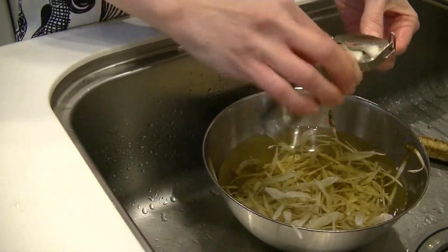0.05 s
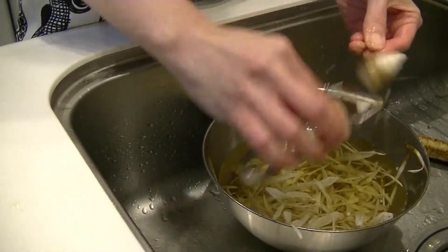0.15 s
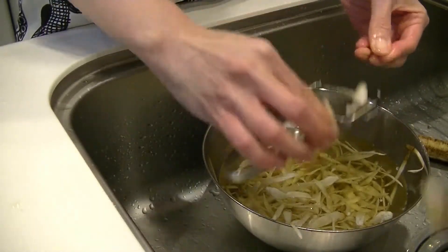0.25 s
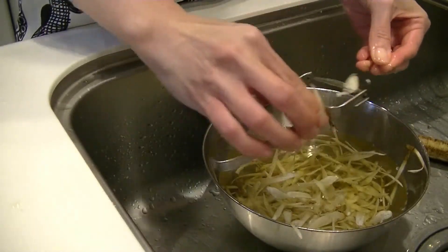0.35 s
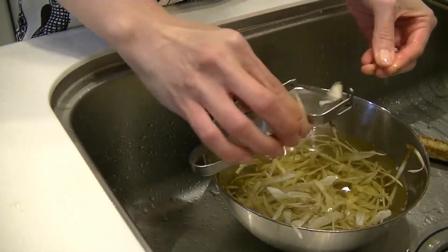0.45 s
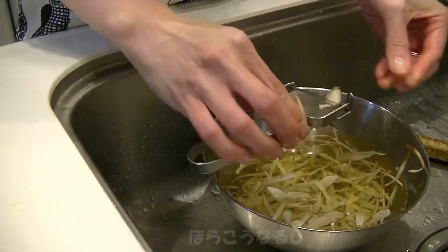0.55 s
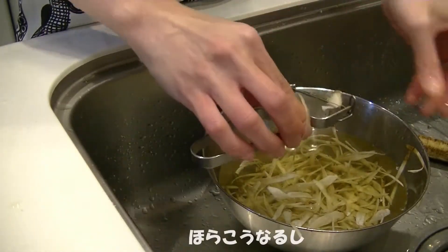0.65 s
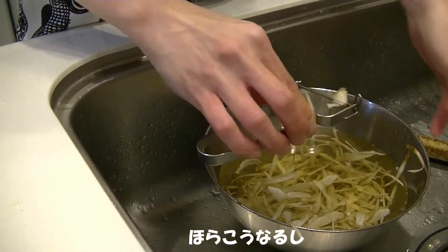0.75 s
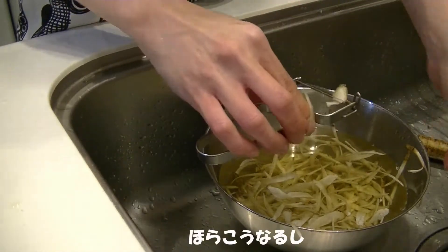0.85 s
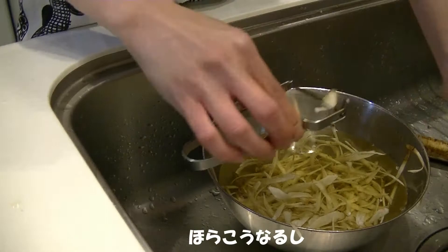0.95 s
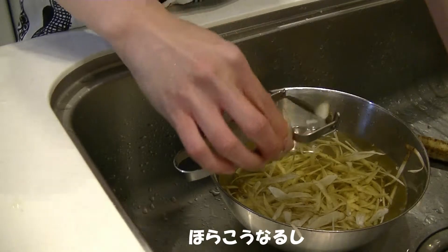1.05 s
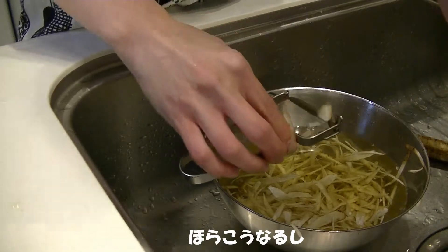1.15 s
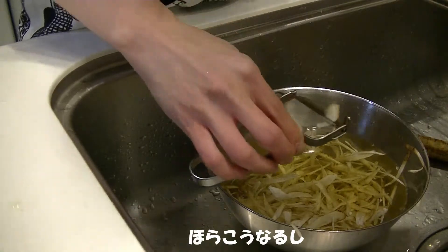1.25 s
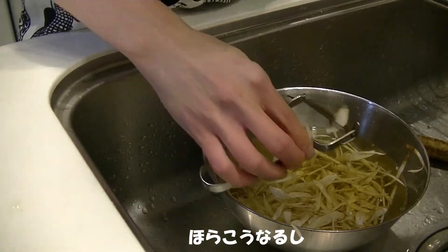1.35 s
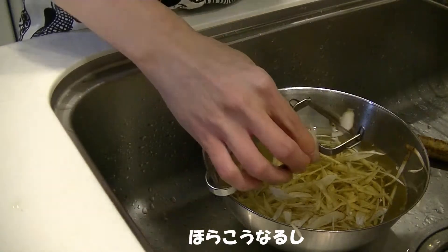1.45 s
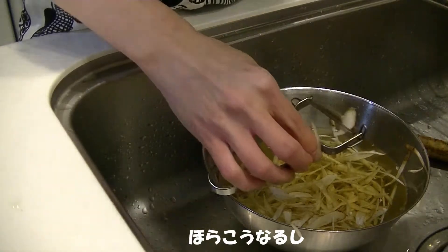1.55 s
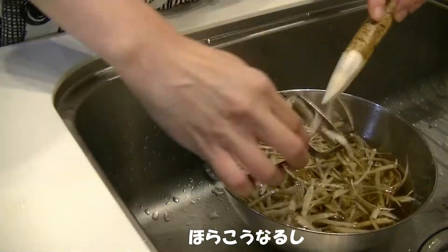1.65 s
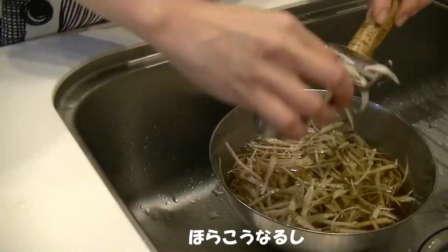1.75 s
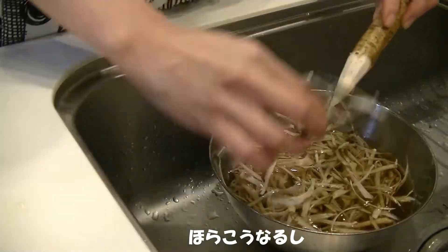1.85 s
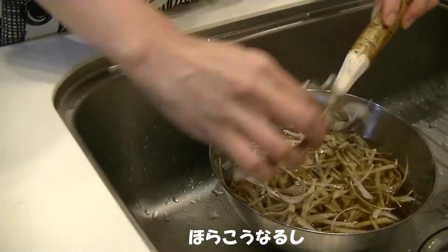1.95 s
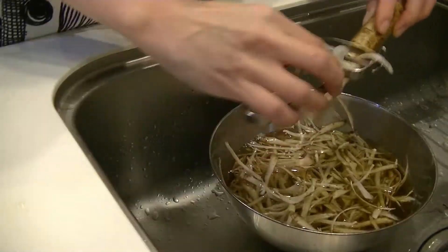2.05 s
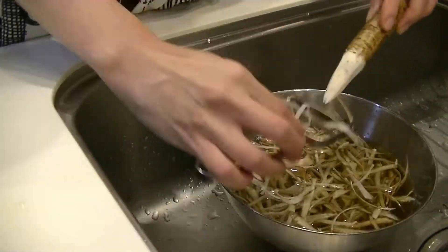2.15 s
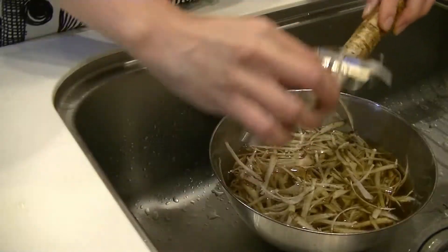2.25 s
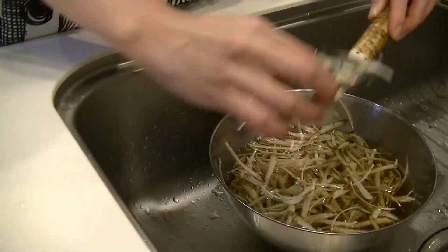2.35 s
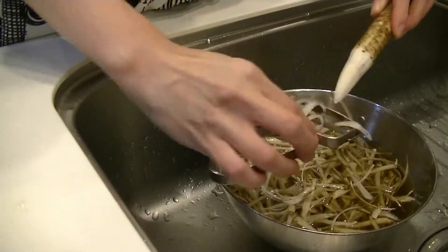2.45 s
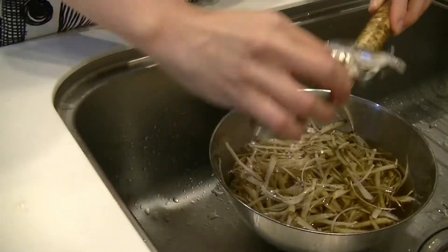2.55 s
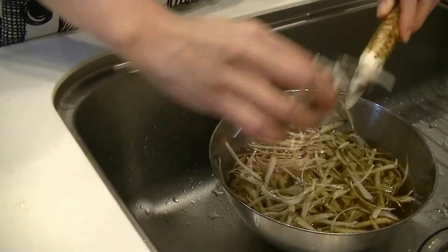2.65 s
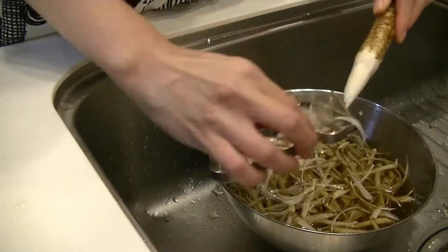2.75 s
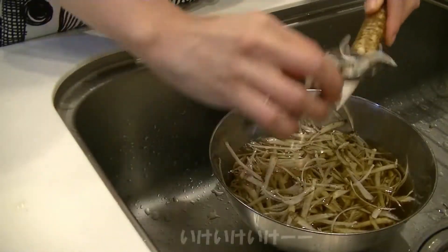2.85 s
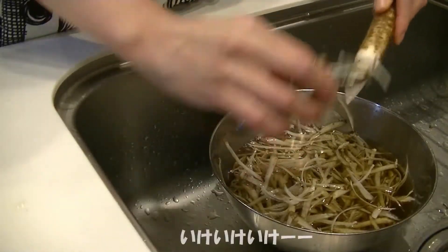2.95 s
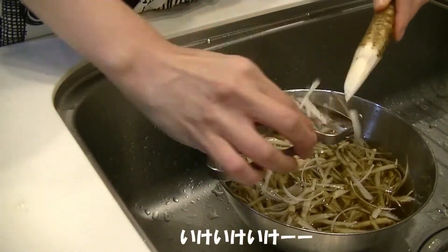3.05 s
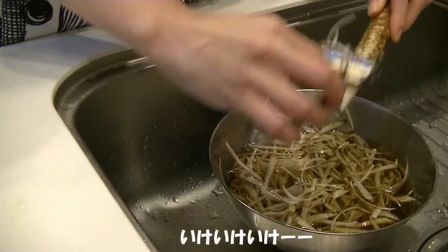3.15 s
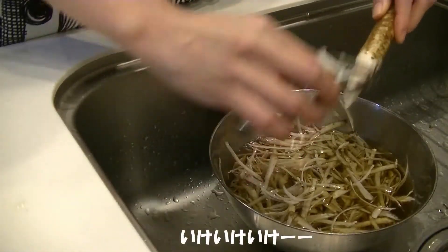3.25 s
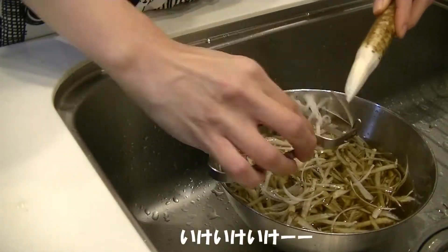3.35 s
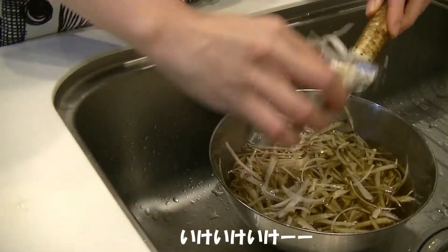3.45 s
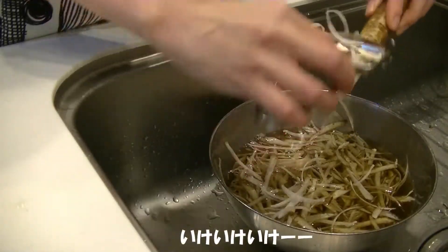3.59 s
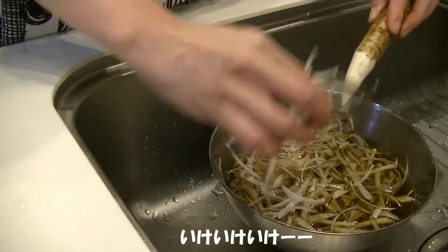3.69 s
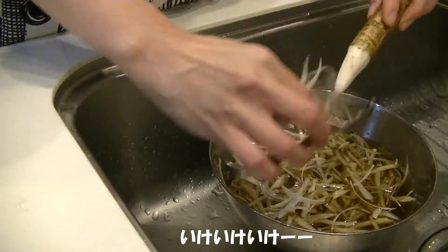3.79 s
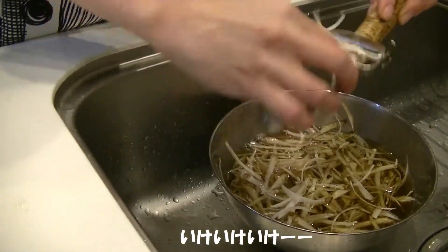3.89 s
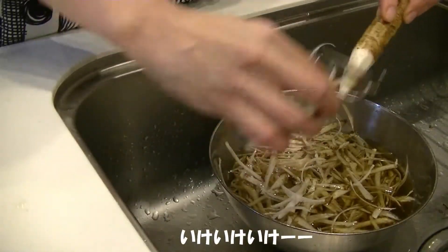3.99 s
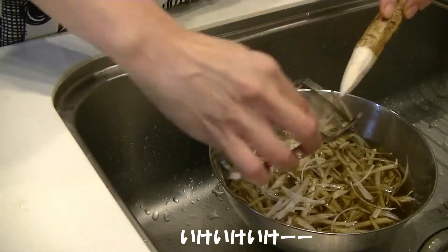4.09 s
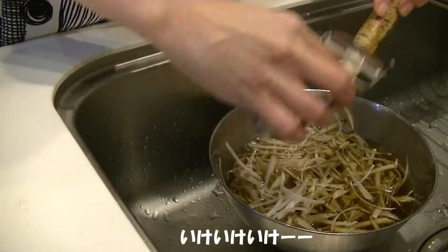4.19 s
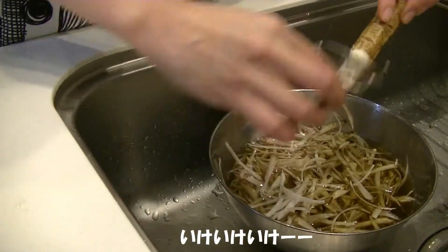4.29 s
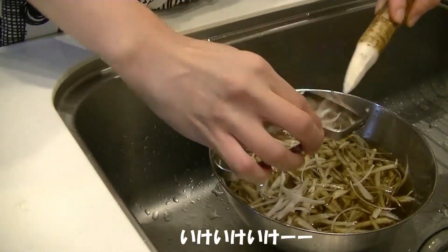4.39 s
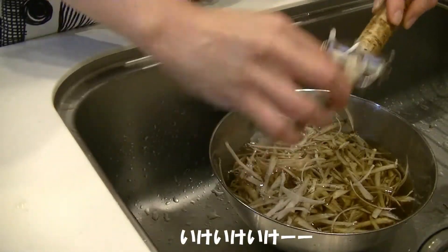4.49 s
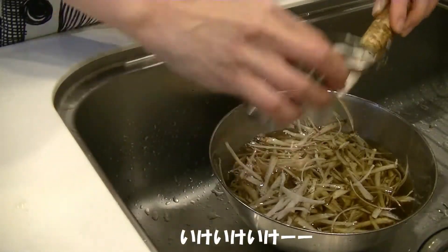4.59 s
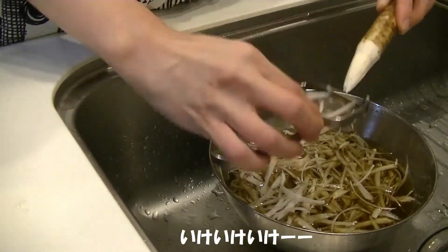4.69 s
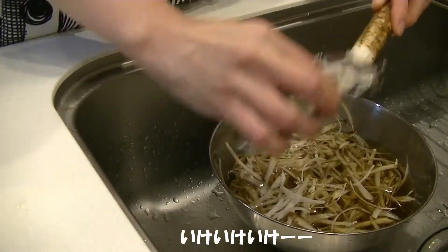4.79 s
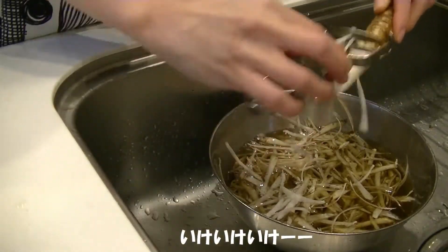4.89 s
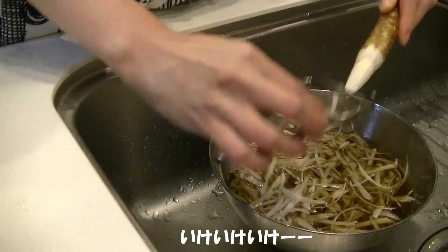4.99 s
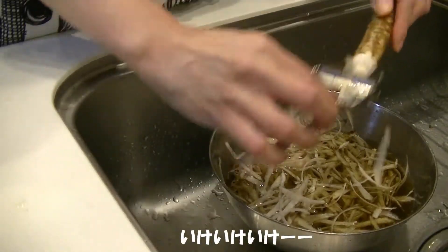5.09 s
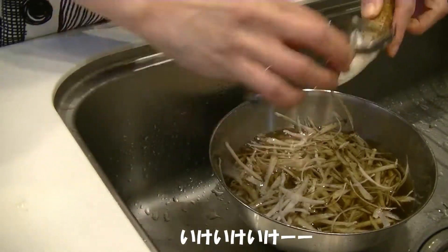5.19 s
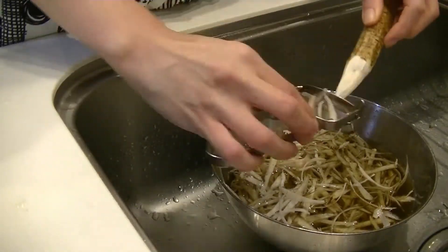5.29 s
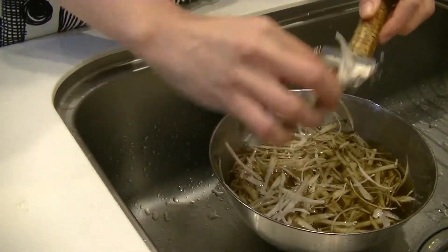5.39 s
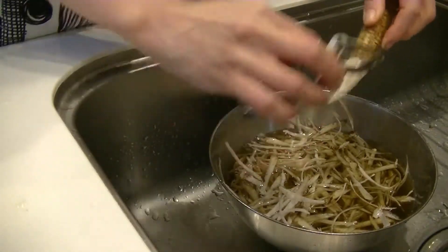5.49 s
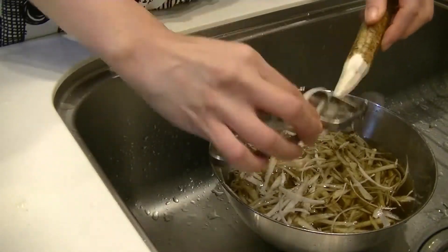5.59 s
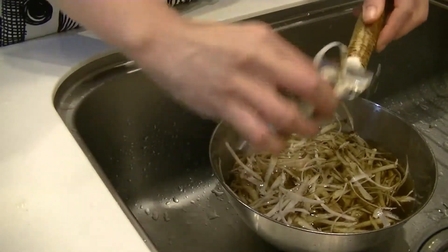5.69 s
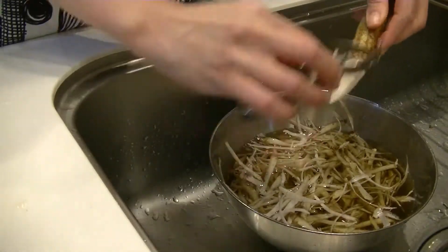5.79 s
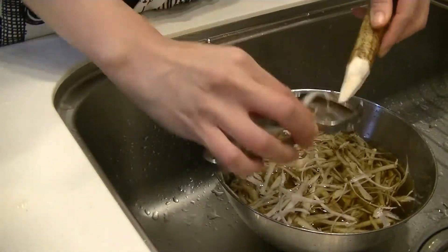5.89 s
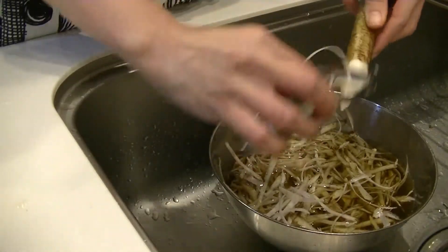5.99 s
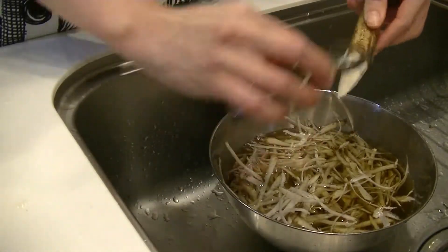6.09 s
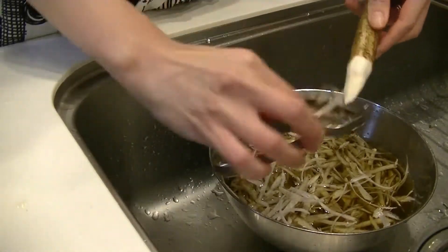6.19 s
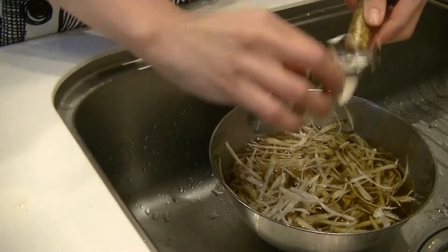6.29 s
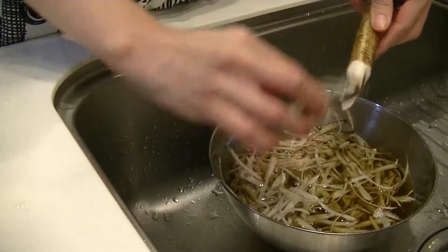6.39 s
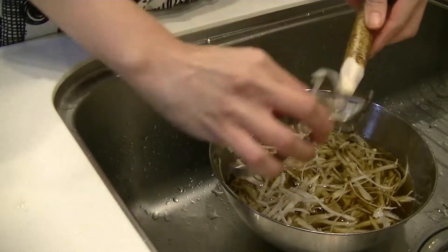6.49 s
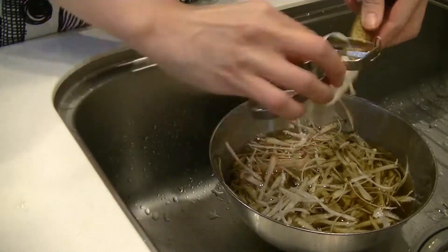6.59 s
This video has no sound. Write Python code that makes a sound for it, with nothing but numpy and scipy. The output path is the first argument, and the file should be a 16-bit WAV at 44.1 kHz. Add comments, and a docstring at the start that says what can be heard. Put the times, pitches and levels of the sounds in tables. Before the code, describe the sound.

A hand peeler scrapes a root briefly at the start, with a few sharp metallic clicks from its loose blade. From about 0.4 to 0.9 seconds a root stump bounces in a steel sink, a quick cluster of hollow knocks with a short metallic ring. A lull follows, with a tiny drip near 1.3 seconds and a few faint taps around 1.5. At about 1.7 seconds the peeling resumes and continues until the end at roughly 6.6 seconds. The strokes are fast and regular, six or seven a second, each a crisp, high, grainy rasp followed by a softer drag back, while the blade clicks and rattles lightly on its pivots. Everything is close, in a small kitchen with slight reverberation. A faint fan rushes steadily behind, dropping abruptly a little in level as the peeling resumes.

```python
"""Peeling a root over a steel sink.

A hand peeler shaves a root in quick strokes: snapping fibres drive the resonances of blade, frame and
handle as it cuts and drags back, and the loose blade clicks on its pivots. Early on the root's stump
bounces in the sink, setting the sheet ringing, and a drop falls. The small kitchen reverberates;
a fan rushes behind."""
import sys
import numpy as np
from scipy import signal
from scipy.fft import rfft, irfft, next_fast_len
from scipy.io import wavfile
from scipy.ndimage import uniform_filter1d, map_coordinates

SR = 44100
rng = np.random.default_rng(int(sys.argv[2]) if len(sys.argv) > 2 else 0)


def dump(signal):
    """Clip the signal to [-1, 1] and save it as 16-bit WAV at the path in sys.argv[1]."""
    limited = np.clip(np.atleast_2d(signal).T, -1, 1)
    pcm = np.round(limited * 32767).astype(np.int16)
    wavfile.write(sys.argv[1], SR, pcm)


N = 292824

# Pivot impacts; frame weights the frame's ring, upper favours its high modes over its low ones:
# (time [s], level [dB], t60 [ms], frame [dB], upper [dB])
PIVOT_CLICKS = [(0.056, -50.5, 29, 2, -3), (0.073, -25, 30, -14.5, 0), (0.081, -15, 23, -11, 6.5),
                (0.142, -16.5, 30, -10, -4), (0.159, -19, 80, -18.5, -2), (0.328, -34, 120, -26, -3),
                (1.691, -25, 40, -17, 0), (1.729, -25.5, 37, -24, 0), (1.881, -27.5, 48, -11, 1),
                (1.994, -16.5, 42, -12.5, 6.5), (2.037, -23, 45, -15.5, 2), (2.177, -25.5, 38, -17, 2),
                (2.209, -33.5, 66, -9, -1), (2.372, -23, 55, -21, 1), (2.52, -22.5, 45, -16.5, -5),
                (2.828, -21, 37, -20.5, 0), (2.978, -26.5, 36, -14, -8), (3.063, -35, 28, -16, 2),
                (3.12, -29, 25, -14.5, 3.5), (3.203, -33.5, 130, -9.5, -2), (3.275, -27.5, 45, -16.5, 0),
                (3.418, -28, 36, -17, -4), (3.573, -29.5, 55, -15, -11), (3.718, -25.5, 30, -12, -4.5),
                (3.869, -22.5, 54, -14.5, -7), (4.024, -28, 80, -17, -8), (4.165, -25, 46, -11, 1.5),
                (4.319, -33, 28, -13.5, -3), (4.454, -24.5, 34, -17, -9), (4.488, -37, 45, -15, -3.5),
                (4.602, -28.5, 30, -18, -1), (4.699, -23.5, 30, -15.5, 5), (4.76, -25, 46, -21, -4),
                (4.844, -21.5, 35, -9.5, 4), (4.903, -27.5, 21, -21, -7), (4.984, -25, 75, -13.5, 7),
                (5.043, -19, 12.1, -18, -6), (5.127, -37, 21, -14, 3), (5.176, -22, 41, -18.5, -9),
                (5.205, -25.5, 55, -16, -6), (5.336, -19.5, 28, -14.5, -9), (5.37, -30.5, 42, -11, 4),
                (5.449, -35, 25, -17, 5), (5.506, -27, 54, -14, -1.5), (5.659, -25.5, 21, -20, -2),
                (5.802, -21.5, 25, -17.5, 6), (5.953, -25, 70, -17.5, -9.5), (6.107, -26, 34, -18.5, 1),
                (6.193, -37, 15, -17, -4), (6.268, -31.5, 88, -13, 2), (6.373, -19.5, 34, -10, 7.5),
                (6.417, -25.5, 84, -13.5, -4.5), (6.577, -25.5, 25, -11, -6)]


def peeler():
    """Forced vibration: fibres snap in tiny uneven grains and ring the modes of the tool."""
    # Resonances of blade and frame: (frequency [Hz], bandwidth [Hz], gain [dB])
    blade_modes = [(4910, 35, -13), (6010, 440, -7), (7600, 190, -9.5), (7890, 130, -2.5), (8800, 86, -2),
                   (9110, 190, -3), (9760, 175, 1.5), (10380, 260, -1), (11240, 440, -2.5), (11940, 170, 0),
                   (13900, 300, -4.5), (14600, 180, -8), (15800, 200, -9)]
    frame_low = [(2153, 220, 2.5), (2535, 97, 4.5)]
    frame_high = [(3178, 180, -0.5), (4260, 180, -9.5)]
    # First row, a faint sub-bass swell that comes with each contact; the rest, resonances of handle and hand: #
    # (frequency [Hz], bandwidth [Hz], gain [dB])
    thud_and_handle = [(60, 60, -12.5), (650, 810, -3), (1600, 840, -1)]
    # Hiss of the fibres: (frequency [Hz], spectral level [dB])
    fibre_spectrum = [(1500, -35), (3500, -7), (5000, -6), (7000, 0.5), (10000, 1), (12300, -3.5),
                      (13100, -10), (15500, -13)]
    # Left-right likeness of the hiss: (frequency [Hz], coherence [ratio])
    coherence = [(1500, 0.63), (3100, 0.64), (6800, 0.43), (11000, 0.47), (15000, 0.5)]
    grains = unit(amp(2.2 * wobble(1500) + 1.6 * wobble(300)))
    taps = np.zeros(N)  # metal meets metal in one instant
    taps[np.round(np.transpose(PIVOT_CLICKS)[0] * SR).astype(int) + 4] = amp(8.5)
    excite = lambda: stereo_noise(coherence, patchy_db=2.5, size=256) * grains + taps
    rms_gain = lambda response: np.sqrt(np.mean(np.abs(response(np.linspace(0, SR / 2, 4000))) ** 2))
    hiss = lambda hz: amp(along(fibre_spectrum, hz))
    blade_force, *body_forces = contact_forces()
    drive = blade_force * excite()
    blade = filtered(drive, hiss)
    for mode in blade_modes:  # grip and angle change which modes sound
        blade += amp(4.5 + 3.9 * wobble(22)) * filtered(drive, resonances([mode]))
    out = amp(-3.5) * blade / rms_gain(hiss)
    for force, table in zip(body_forces, [frame_low, frame_high, thud_and_handle]):
        response = resonances(table)
        out += amp(3) * filtered(force * excite(), response) / rms_gain(response)
    return out


def contact_forces():
    """Incoherent contacts add in power: force envelopes for blade, low and high frame modes, handle."""
    # A cut down the root and a drag back; rises and fades span 20 dB: (time [s], level [dB], fade [ms],
    # frame [dB], upper [dB], drag delay [ms], drag level [dB], drag rise [ms])
    strokes = [(1.689, -35.5, 14, -5.5, 2, 35, -39, 35), (1.821, -30, 40, -10.5, 3, 60, -41, 37),
               (1.974, -40.5, 17, -15.5, -6, 77, -43, 84), (2.146, -30.5, 23, -7.5, 9.5, 38, -49, 47),
               (2.307, -27.5, 26, -13.5, 6, 67, -42, 57), (2.461, -26, 25, -11, -1, 72, -44, 82),
               (2.615, -27.5, 31, -12.5, -2, 56.7, -34, 27), (2.765, -30, 44, -9, 2.5, 63, -38.5, 30),
               (2.922, -30, 26, -6.5, 5.5, 54, -32.5, 26), (3.068, -31.5, 41, -8.5, 1, 52.5, -33.5, 23.4),
               (3.223, -32.5, 27, -8.5, 5, 54, -37.5, 46), (3.367, -28, 26, -11, -3, 53.4, -37, 38),
               (3.512, -31, 30, -9, -4, 58, -42.5, 75), (3.657, -32.5, 36, -9.5, -1.5, 71, -40.5, 45),
               (3.816, -31, 23, -5, 5, 59, -43.5, 81), (3.965, -30, 32.5, -7.5, 3, 63, -39.5, 33),
               (4.109, -30, 35, -7, -3, 57, -40, 36), (4.259, -30, 35, -9, 2, 56, -31.5, 13),
               (4.4, -29.5, 24, -7.5, 1.5, 59, -37, 36), (4.549, -30.5, 29, -12, 2, 64, -36, 44),
               (4.693, -38, 49, -4, 5.5, 60, -38.5, 28), (4.84, -35, 43, -4, 3.5, 58.5, -32.5, 21),
               (4.982, -35, 49, -6.5, -2, 60, -32, 17), (5.135, -32.5, 34, -8.5, 2.5, 43, -44, 27),
               (5.292, -30.5, 41, -9, 0.5, 53, -50, 45), (5.451, -30.5, 27, -6, 5, 56, -45.5, 57),
               (5.596, -30, 35, -8.5, 3, 70, -36, 31), (5.745, -29.5, 32, -11.5, 4, 60, -33, 26),
               (5.895, -29, 26, -13, 4.5, 56, -44.5, 83), (6.043, -30, 37, -11, 8.5, 62, -35.5, 26),
               (6.2, -30.5, 41, -10, 2, 79, -47, 67), (6.358, -37, 27, -13.5, -5, 60, -41, 30),
               (6.518, -30.5, 51, -13.5, 3, 75, -41, 44)]
    # Stray scrapes: (time [s], level [dB], rise [ms], fade [ms], frame [dB], upper [dB])
    scrapes = [(0.079, -25.5, 5, 30, -15, 4), (0.131, -39.5, 82, 27, -10, -.6),
               (0.161, -30, 16, 81, -14, -2), (0.207, -37.5, 9, 100, -9.5, 3),
               (0.335, -35, 10, 25, -14, -2), (1.385, -53.5, 11, 22, -5, -6), (1.468, -60, 4, 17, 3, -10),
               (1.5, -62, 20, 22, -4, -5), (1.53, -60.5, 8, 33, 14, -13), (1.565, -63, 16, 25, -2, -10),
               (2.074, -40, 6, 21, -17, 0), (2.227, -34.5, 42, 11, -16.5, 9), (5.197, -37, 5.5, 29, -7, -2),
               (5.368, -47, 21, 38, -4, -3)]
    cut_rise_ms, drag_fade_ms, drag_upper_db = 15, 28.7, -2.5
    rub_handle_db, click_handle_db = -22.5, -24.5
    rubs = list(scrapes)
    for s, db, fade, frame_db, upper_db, delay, drag_db, drag_rise in strokes:
        drag_frame_db = -11.5 + 0.5 * (-33 - drag_db)  # softer drags have more ring for their hiss
        rubs += [(s - 0.013, db - 14, 11.3, 13, frame_db, upper_db),  # the blade brushes, then bites
                 (s, db, cut_rise_ms, fade, frame_db, upper_db),
                 (s + delay / 1000, drag_db, drag_rise, drag_fade_ms, drag_frame_db, drag_upper_db)]
    lead, tail = 6000, 8000  # samples around each peak
    t = np.arange(-lead, tail) / SR
    ms = 1000 * np.abs(t)
    swell_db = lambda rise, fade: -20 * (ms / np.where(t > 0, fade, rise)) ** 1.81
    snap_db = lambda t60: np.where(t > 0, 4 * np.exp(-ms / 0.22) - 60 * ms / t60, -60 * ms)
    contacts = [(s, db + swell_db(rise, fade), *ring, rub_handle_db) for s, db, rise, fade, *ring in rubs]
    contacts += [(s, db + snap_db(t60), *ring, click_handle_db) for s, db, t60, *ring in PIVOT_CLICKS]
    power = np.zeros((4, 2, N + len(t)))
    for s, envelope_db, frame_db, upper_db, handle_db in contacts:
        pan_db = rng.normal(-0.8, 1)
        parts_db = [0, frame_db - 5 - upper_db / 2, frame_db - 3 + upper_db / 2, rng.normal(handle_db, 2.5)]
        gains = amp(np.add.outer(parts_db, [pan_db / 2, -pan_db / 2]))
        power[..., round(s * SR):][..., :len(t)] += (gains[..., None] * amp(envelope_db)) ** 2
    return np.sqrt(power[..., lead:lead + N])


def sink():
    """Impact excitation: a knock's short push leaves the steel sheet in damped free vibration."""
    # Knocks, each favouring two bands: (time [s], ring [dB], first band [Hz], second band [Hz],
    # second gain [dB], narrowness [dB/octave^2], damping [ratio], push [dB], push [Hz], crack [dB])
    knocks = [(.359, -17.5, 670, 445, -9, 46, 0.98, -9, 1530, -23),
              (.361, -24, 1250, 1890, -3, 29, 1.6, 1.5, 570, -27.5),
              (.474, -16.5, 870, 510, -12, 60, 1.6, -6, 525, -31),
              (.534, -20, 1110, 800, -7, 50, 1, -17, 1000, -35.5),
              (.536, -32.5, 490, 2060, -3.5, 45, 0.71, -1, 890, -46),
              (.538, -29, 3240, 4830, 2, 34, 1.24, -40, 900, -53),
              (.618, -20.5, 596, 970, 1.3, 52, 2.7, -26, 600, -37.5),
              (.624, -25, 1340, 291, -2, 50, 2.1, -14.5, 630, -56),
              (.753, -15, 463, 970, -6, 43, 1.6, 2.5, 865, -34.5),
              (.773, -32, 930, 2380, -18, 20, 0.86, -28, 900, -41),
              (.825, -29.5, 450, 930, -12, 43, 1.3, -21, 450, -57),
              (.849, -24.5, 463, 950, -5, 41, 2, -14.5, 494, -37),
              (1.376, -46.5, 490, 1000, -2, 25, 2.5, -41, 500, -42.5),
              (1.522, -40.5, 510, 1520, -1, 15, 2.5, -37, 520, -39),
              (1.55, -46.5, 456, 1000, -14, 18, 2, -34, 454, -46),
              (1.599, -37.5, 490, 960, -4, 36, 2, -22, 580, -60)]
    # Distinct sheet modes: (frequency [Hz], level [dB], t60 at unit damping [s])
    sheet_modes = [(274.2, -3, 0.74), (297, 2, 0.28), (397, -10.5, 0.59), (426, -6, 0.48), (455, -5, 0.61),
                   (520, -4.5, 0.53), (514, 4, 0.11), (609, -3.5, 0.36), (600, -7.5, 0.37), (688, -6, 0.37),
                   (753, -11.5, 0.41), (870, -3, 0.21), (950, -10.5, 0.26), (961, -4, 0.3),
                   (1001, -1.5, 0.09), (1105, -16, 0.15), (1156, -7.5, 0.39), (1310, -25.5, 0.23),
                   (1500, -18, 0.23), (1640, -7, 0.16), (1994, -12, 0.16), (1910, -3, 0.18),
                   (2050, -10.5, 0.33), (2450, -9, 0.15), (2210, -2, 0.13), (3180, -6, 0.05),
                   (3970, -10, 0.08), (4850, -12, 0.092)]
    # Noise of the dense modes and of the impact: (frequency [Hz], spectral level [dB])
    rumble_spectrum = [(120, -34), (300, -9), (600, -15), (1200, -2), (2500, -10), (5000, -30.5),
                       (9000, -37), (16000, -60)]
    crack_spectrum = [(1500, 3), (2500, -2), (5000, -1), (9000, -6.5), (16000, -35)]
    # Decay of those noises: (frequency [Hz], t60 [s])
    rumble_decay = [(150, 0.4), (400, 0.76), (1040, 0.25), (2760, 0.29), (7280, 0.4)]
    crack_decay = [(2000, 0.16), (7000, 0.078), (16000, 0.024)]
    # A drop rings on the steel: (time [s], level [dB], frequency [Hz], t60 [s])
    drop = (1.266, -50, 4200, .06)
    out, t = np.zeros((2, N + SR)), np.arange(SR // 2) / SR
    hz, mode_db, t60 = np.transpose(sheet_modes)[..., None]
    for s, db, first_hz, second_hz, second_db, narrow_db, damping, push_db, push_hz, crack_db in knocks:
        band = lambda f, centre: amp(-narrow_db * np.log2((f + 1) / centre) ** 2)
        coupling = lambda f: band(f, first_hz) + amp(second_db) * band(f, second_hz) + amp(-15)
        envelopes = coupling(hz) * amp(mode_db + rng.normal(0, 2.4, hz.shape) - 60 * damping * t / t60)
        ring = np.sum(envelopes * np.sin(2 * np.pi * (hz * t + rng.random(hz.shape))), 0)
        mid, side = filtered(decaying_noise(rumble_spectrum, rumble_decay, len(t)), coupling)
        rumble = amp(29) * np.array([mid + 0.16 * side, mid - 0.099 * side])
        sheet = amp(db) * (ring + rumble) * (1 - np.exp(-t / 0.001))
        push = amp(push_db) * t / 0.00093 * np.exp(1 - t / 0.00062) * np.sin(2 * np.pi * push_hz * t)
        crack = amp(crack_db + 26) * decaying_noise(crack_spectrum, crack_decay, len(t))
        out[:, round(s * SR):][:, :len(t)] += sheet + push + crack
    s, db, drop_hz, drop_t60 = drop
    envelope = amp(db - 60 * t / drop_t60) * (1 - np.exp(-t / 0.0026))
    out[:, round(s * SR):][:, :len(t)] += envelope * np.sin(2 * np.pi * drop_hz * t)
    # a low cut at 200 Hz thins the knocks' bass
    return signal.sosfilt(signal.butter(2, 200, "high", fs=SR, output="sos"), out[:, :N])


def kitchen(x):
    """Reverberation: convolution with a diffuse tail that arrives a little late."""
    # Reverberation time: (frequency [Hz], t60 [s])
    room_decay = [(200, 0.12), (2000, 0.36), (10000, 0.11)]
    tail = decaying_noise([(100, -9), (16000, -4)], room_decay, SR // 3)
    delayed = np.pad(x.mean(0), (250, 0))
    return signal.fftconvolve(delayed[None], tail, axes=1)[:, :N]


def fan():
    """Broadband flow noise: a steady background rush."""
    # The background as heard, abruptly quieter at 1.67 s: (time [s], level [dB])
    levels = [(0, -47.5), (1.66, -45.5), (1.68, -50.5), (6.64, -50.5)]
    # Moving air: (frequency [Hz], spectral level [dB])
    air_spectrum = [(25, -55), (60, -57), (110, -23), (300, -9.5), (490, -6), (535, -2), (590, -9),
                    (1100, -8), (2000, -13), (2600, -15), (4300, -20.5), (5200, -25.5), (9000, -34.5),
                    (15000, -43), (16000, -47)]
    # Left-right likeness of the rush: (frequency [Hz], coherence [ratio])
    coherence = [(60, 0.47), (240, 0.82), (950, 0.54), (3770, 0.74), (15000, 0.17)]
    level_db = np.interp(np.arange(N) / SR, *np.transpose(levels)) + 0.38 * wobble(14)
    noise = stereo_noise(coherence, patchy_db=2.5, size=512)
    return amp(level_db) * unit(filtered(noise, lambda hz: amp(along(air_spectrum, hz))))


def amp(db):
    """Decibels to amplitude."""
    return 10 ** (np.asarray(db) / 20)


def unit(x):
    """Normalisation to unit RMS."""
    return x / np.sqrt(np.mean(x ** 2) + 1e-20)


def along(points, hz):
    """Interpolation of (frequency [Hz], value) points on a log axis."""
    f, v = np.transpose(points)
    return np.interp(np.log(hz + 1), np.log(f + 1), v)


def wobble(rate):
    """Smooth random modulation, rate knots a second."""
    return map_coordinates(rng.standard_normal(int(N * rate / SR) + 4), [np.arange(N) * rate / SR])


def filtered(x, response):
    """Linear filtering: the spectrum of x times a frequency response."""
    m = next_fast_len(x.shape[-1] + 8192)
    return irfft(rfft(x, m) * response(np.fft.rfftfreq(m, 1 / SR)), m)[..., :x.shape[-1]]


def resonances(table):
    """Modal superposition: the response of damped resonators of alternating sign."""
    return lambda f: sum((-1) ** k * amp(db) * 1j * f * width / (hz * hz - f * f + 1j * f * width)
                         for k, (hz, width, db) in enumerate(table))


def stereo_noise(coherence, patchy_db, size):
    """Partial coherence: mid and side noise, with patches of random gain, mixed by frequency."""
    spectra = signal.stft(rng.standard_normal((2, N)), nperseg=size)[2]
    patches = uniform_filter1d(rng.standard_normal(spectra.shape[1:]), size=5, axis=0)
    patches = unit(uniform_filter1d(patches, size=4, axis=1))
    noise = signal.istft(spectra * amp(patchy_db * patches), nperseg=size)[1][:, :N]
    angle = lambda hz: np.arccos(np.clip(along(coherence, hz), -1, 1)) / 2
    mid, side = filtered(noise, lambda hz: np.array([np.cos(angle(hz)), np.sin(angle(hz))]))
    return unit(np.array([mid + side, mid - side]))


def decaying_noise(spectrum, t60, size):
    """Frequency-dependent damping of stereo noise, with about unit energy a channel."""
    hz, t, spectra = signal.stft(rng.standard_normal((2, size)), SR, nperseg=128)
    level_db = along(spectrum, hz)[:, None] - 60 * t / along(t60, hz)[:, None]
    tail = signal.istft(spectra * amp(level_db), SR, nperseg=128)[1]
    return tail[:, :size] / np.linalg.norm(tail[0])


def scene():
    """Superposition of the close peeler and sink, their reverberation and the fan."""
    strokes, knocks = peeler(), sink()
    return strokes + knocks + kitchen(amp(-12.5) * strokes + amp(-17.5) * knocks) + fan()


def record(dry):
    """Transduction: a slightly unequal microphone pair, soft saturation and a band limit."""
    # Microphone imbalance: (frequency [Hz], left over right [dB])
    imbalance = [(100, -1.2), (700, -3), (4000, 0), (9000, -2), (15000, 2)]
    top_hz, slope_hz = 15720, 140
    x = filtered(dry, lambda hz: amp(np.outer([.5, -.5], along(imbalance, hz))))
    x = x / (1 + np.abs(x) ** 8) ** (1 / 8)
    return filtered(x, lambda hz: np.clip(1 - (hz - top_hz) / slope_hz, 0, 1) ** 2)


dry = scene()
out = record(dry)
dump(out)
```